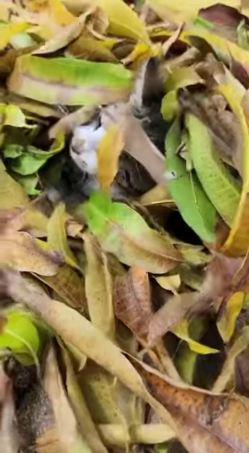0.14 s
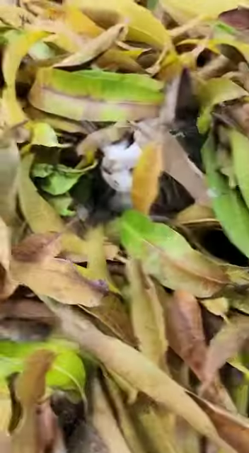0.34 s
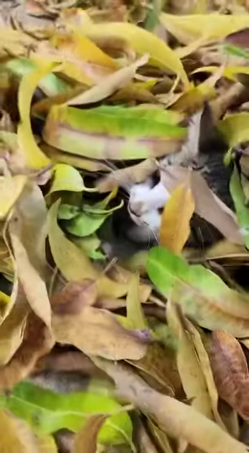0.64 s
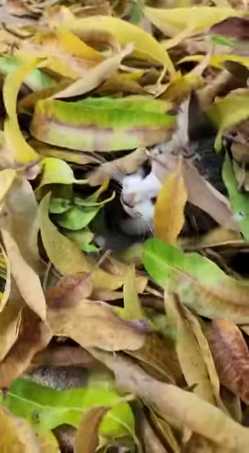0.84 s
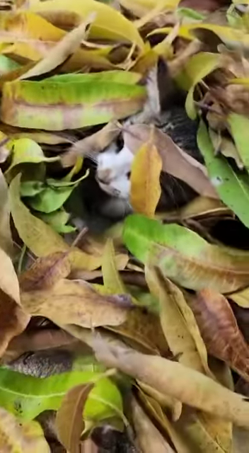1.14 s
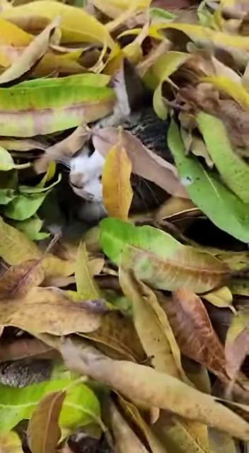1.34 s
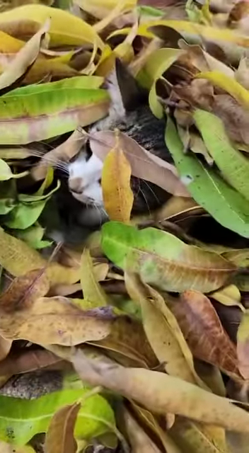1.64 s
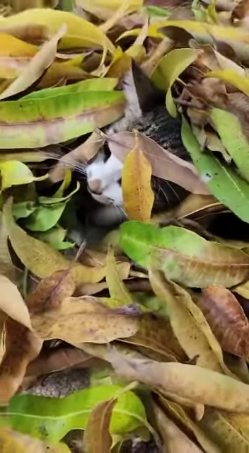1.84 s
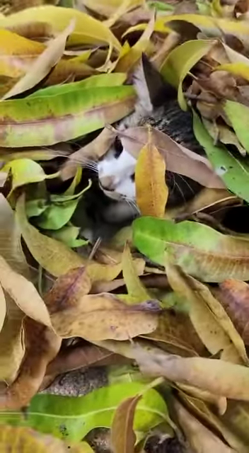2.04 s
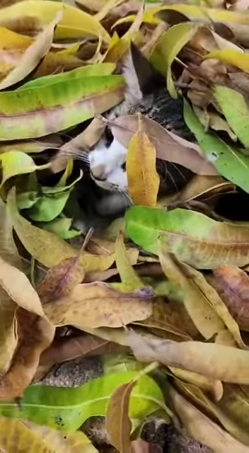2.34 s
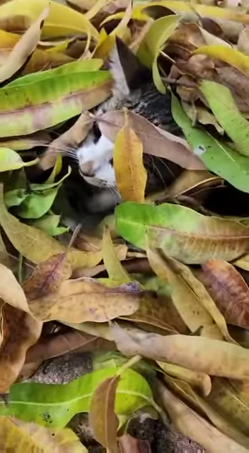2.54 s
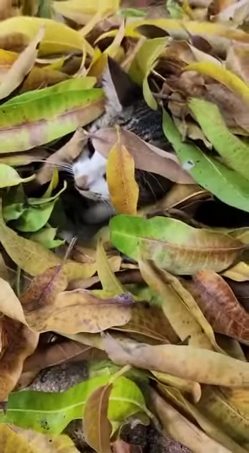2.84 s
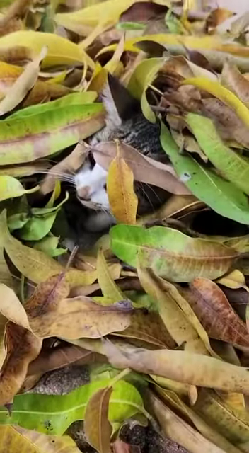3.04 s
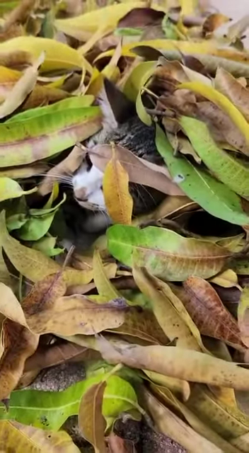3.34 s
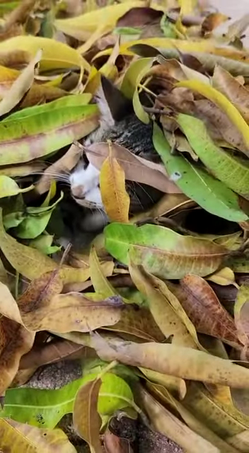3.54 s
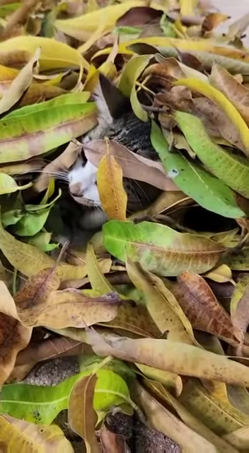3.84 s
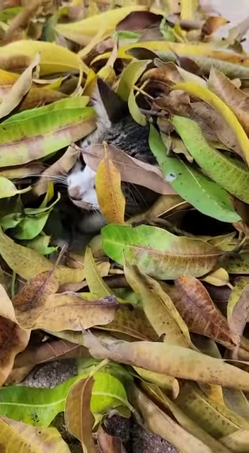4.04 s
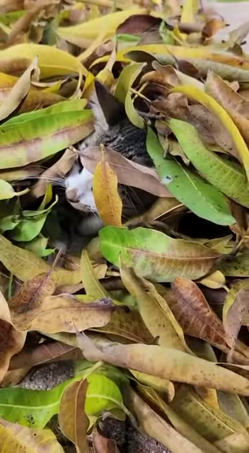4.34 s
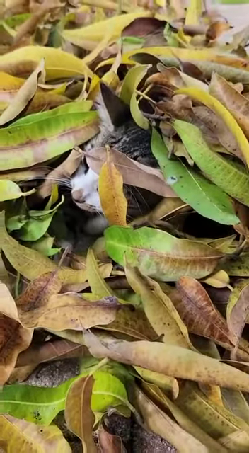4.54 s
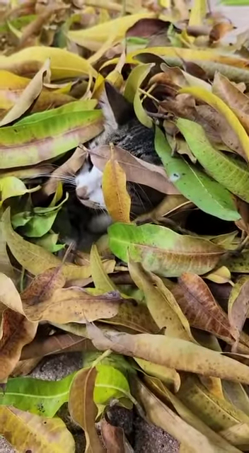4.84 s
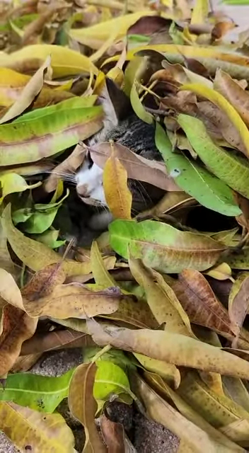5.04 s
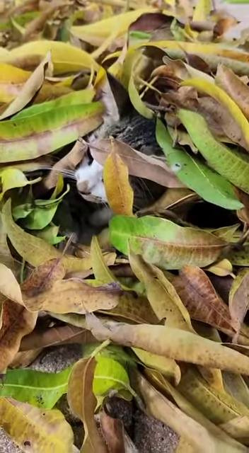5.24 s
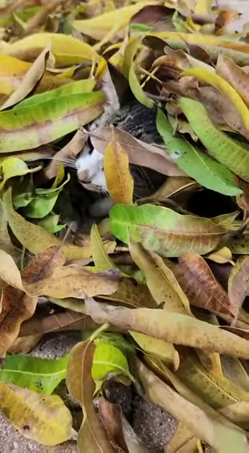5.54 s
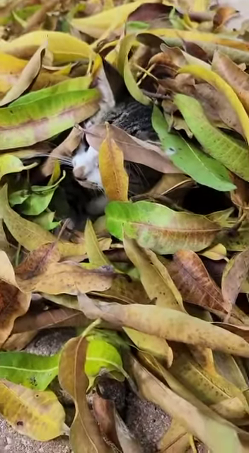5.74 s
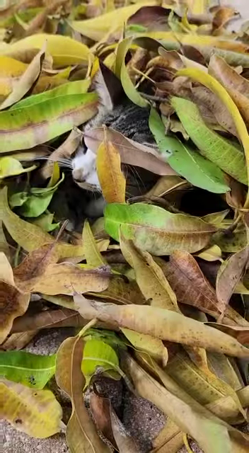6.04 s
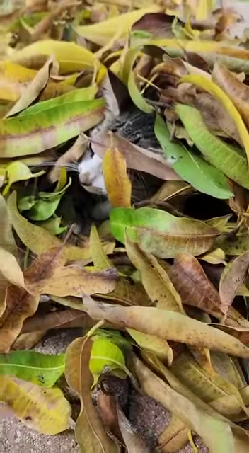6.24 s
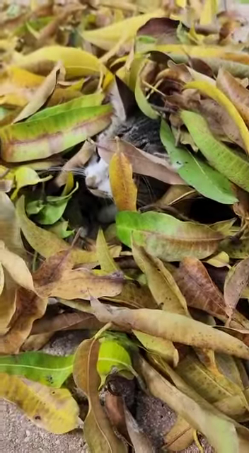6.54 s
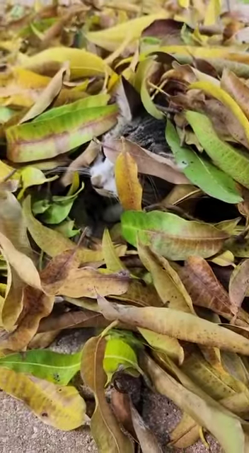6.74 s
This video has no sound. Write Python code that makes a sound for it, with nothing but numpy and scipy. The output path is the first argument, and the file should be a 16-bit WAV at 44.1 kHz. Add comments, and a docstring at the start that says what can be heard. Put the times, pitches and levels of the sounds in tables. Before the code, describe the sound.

Brief piercing kitten cries break into rasping hisses from under a leaf heap, with faint thin whistles, a leaf snap and soft wind puffs.

```python
"""Walled yard: a frightened kitten under a heap of dry leaves gives five shrill cries, close by.
Each starts as a puff of breath and rises to a squeal near 2 kHz; most break up into a rasping hiss.
The cries are sums of partials and half-step partials through a throat filter, plus filtered breath.
Thin whistles are unsteady near-sines; leaves are bursts of noise and random clicks.
Filtered noise gives a low outdoor rumble, faint drones and puffs of wind."""
import sys
import numpy as np
from scipy import signal
from scipy.fft import rfft, irfft, next_fast_len
from scipy.io import wavfile

SR = 44100
rng = np.random.default_rng(int(sys.argv[2]) if len(sys.argv) > 2 else 0)


def wav_record(signal):
    """Record a signal, one row per channel, as 16-bit PCM in the file named by sys.argv[1]."""
    frames = np.transpose(np.atleast_2d(signal))
    bounded = np.clip(frames, -1, 1)
    # unit amplitude maps onto the largest positive 16-bit level
    quanta = np.round(bounded * 32767).astype(np.int16)
    wavfile.write(sys.argv[1], SR, quanta)


N = 303399
T = np.arange(N) / SR

# Kitten's cries. Each row: start, climb, sag in seconds; pitch at catch, crest, end in Hz;
# level at catch, before leap, at crest, at end in dB ahead of the cry gain;
# rasp on climb, at crest, at end, and period doubling, all 0-1.
CRIES = [ (.960, 0.041, .054, 1929, 2279, 2280, -26.5, -24, -18.5, -23, 0.37, 0.06, 0, 0),
         (1.43, .062, 0.13, 2015, 2175, 1995, -24.5, -23, -17.5, -20.5, 0.14, 0.34, 0.88, 0.59),
         (3.591, .064, 0.033, 2060, 2420, 2296, -39.5, -32, -32, -29.5, 0.45, .5, .65, 0.2),
         (3.780, .064, .144, 1941, 2162, 2012, -24, -22.5, -21, -23.5, 0.21, 0.4, 0.89, 0.6),
         (5.659, 0.054, 0.13, 2050, 2430, 1946, -40, -45, -35, -37.5, 0.49, 0.76, 0.87, .35)]
# Whistles of the nearly closed throat. Each row: start, length in seconds, first, last pitch in Hz,
# mid-length level in dB.
WHISTLES = [(0.895, 0.13, 1980, 2200, -57), (1.296, 0.25, 2048, 2240, -51.5),
            (2.825, 0.17, 2160, 2067, -60), (3.39, 0.069, 2020, 2170, -54.5),
            (3.442, .045, 2184, 2314, -43.5), (3.478, .12, 2384, 2680, -44), (5.417, .185, 1877, 2490, -49),
            (5.579, 0.098, 2404, 2196, -54.5), (6.093, .65, 2052, 2100, -64.5)]
# Throat resonances. Each row: frequency in Hz, relative gain in dB.
THROAT_SPECTRUM = [(1600, -19), (2200, -11), (2650, -2), (3150, -5.5), (3600, -5), (4300, 2.5),
                   (4900, -1.5), (6500, 2.5), (7200, 0.5), (8000, -0.5), (8900, -22.5), (9900, -12.5),
                   (14500, -16.5), (16000, -26)]
# Breath through the open mouth. Each row: frequency in Hz, relative level in dB.
MOUTH_SPECTRUM = [(900, -46), (1600, -25), (2100, -27), (2550, -11), (3100, 15), (4000, 5), (4800, 4.5),
                  (6300, -3.5), (7700, 8), (8900, -53), (9700, 2), (11200, -37), (14500, -19), (16000, -26)]
# Direct cries at the two ports. Each row: frequency in Hz, left minus right in dB ahead of the pan.
PORT_DIFFERENCE = [(2000, 6), (4300, 3.5), (6600, 1.5), (7600, 4.5), (8400, -11), (10000, -12.5),
                   (12000, -4), (15000, 3.5)]
# Dry leaves snapping. Each row: start in seconds, relative peak in dB.
SNAPS = [(0.6115, -23), (0.6134, -30), (0.615, -37), (1.975, -47), (2.667, -61)]
# Spectrum of a snap. Each row: frequency in Hz, relative level in dB.
SNAP_SPECTRUM = [(500, -28), (1300, -7), (2050, -3), (2700, -4), (3400, -2), (4500, 8.5), (6000, -8),
                 (9000, -25), (15000, -37)]
# Leaves shifting. Each row: start-side centre in seconds, rise, fall to 1/e in seconds, peak level in dB.
SHIFTS = [(.07, 0.17, 0.086, -55), (.66, 0.46, 0.095, -57), (2.81, 0.077, 0.085, -53.5),
          (3.5, .04, 0.088, -59)]
# Spectrum of rustling. Each row: frequency in Hz, relative level in dB.
LEAF_SPECTRUM = [(1000, -7), (2500, 12.5), (5000, 6.5), (7500, 10), (9500, -6), (15500, -6)]
# Outdoor air. Each row: frequency in Hz, relative level in dB.
AIR_SPECTRUM = [(12, -18.5), (20, -7), (43, 1), (101, -4), (172, -10.5), (357, -16.5), (472, -26),
                (513, -21.5), (660, -24.5), (1570, -31), (1760, -34.5), (2080, -35.5), (3440, -39.5),
                (7310, -45), (16000, -91)]
# Stereo spread of the outdoor air. Each row: frequency in Hz, side minus mid in dB.
AIR_SIDE = [(40, -24), (150, -17), (350, -11), (700, -2), (1300, 0.5), (3000, -0.5), (12000, 0)]
# Faint resonances of the surroundings. Each row: frequency, width in Hz, level in dB.
DRONES = [(196.7, 18, -57.5), (353, 20, -61), (792, 160, -62), (2013, 340, -70)]
# Puffs of wind. Each row: centre, half width to 1/e in seconds, peak level in dB ahead of the pan.
GUSTS = [(1.36, 0.055, -38.5), (2.115, 0.035, -25), (2.31, 0.11, -29), (2.477, 0.027, -25.5),
         (2.85, 0.16, -39), (3.32, 0.3, -41.5), (4.71, 0.044, -32)]
# Spectrum of the wind. Each row: frequency in Hz, relative level in dB.
WIND_SPECTRUM = [(20, -12), (45, 3.5), (65, -5), (90, -5), (140, -21.5), (300, -39), (1000, -87)]

# Cry: puff, catch, climb, leap, sag, release
ATTACK_S, CATCH_S, LEAP_S, RELEASE_S = .013, .053, .030, .04
PUFF_PITCH_SHARE, PUFF_RASP = .84, 1  # pitch as a share of the catch
PUFF_DB, PUFF_BREATH_DB = -11, 7.5  # level against the catch; extra breath
CLIMB_PITCH_SHARE = .42  # part of the pitch rise covered before the leap
SAG_SWELL_DB, RELEASE_DB, RELEASE_PITCH_SHARE = 1, -26, .89
CLEAR_BREATH_DB, RASPY_BREATH_DB = -29.5, -1.5  # breath against voice at rasp 0 and 1
CRY_GAIN_DB = .5
WHISTLE_EDGE_DB = -9  # ends against the middle
SETTLING_DB, AIR_DB, BREEZE_DB = -76, -39.5, -51.5  # steady rustle, air, wind between puffs
TOP_HZ = 15850
OPPOSITE = np.array([[1], [-1]])  # left, right


def undb(db):
    """Decibels to gain."""
    return 10 ** (np.asarray(db) / 20)


def unit(x):
    """Scale to rms 1."""
    return x / np.sqrt(np.mean(x ** 2) + 1e-18)


def span(start_s, length_s):
    """Sample indices that an event covers."""
    return np.flatnonzero((T >= start_s) & (T <= start_s + length_s))


def colour(x, points, share=1):
    """Zero-phase filter by a share of a (Hz, dB) spectrum."""
    n = x.shape[-1]
    size = next_fast_len(n + 512)
    point_hz, point_db = np.transpose(points)
    hz = np.maximum(np.arange(size // 2 + 1) * SR / size, 1)
    gain = undb(share * np.interp(np.log(hz), np.log(point_hz), point_db))
    return irfft(rfft(x, size) * gain, size)[..., :n]


def wobble(hz):
    """Low-passed random motion, rms 1."""
    lowpass = signal.butter(2, hz, fs=SR, output="sos")
    return unit(signal.sosfilt(lowpass, rng.standard_normal(N)))


def cries(jitter=.0499, jitter_hz=190, slip_skew=.32, waver=.0051, waver_hz=60,
          shimmer=.65, shimmer_hz=150, doubling_db=-5.5, flap=.2, dull_db=-.42, full_db=-23):
    """Tight vocal folds squeal; with rasp their period and swing turn irregular and breath takes over."""
    out = np.zeros(N)
    # near their tightest, the folds slip further down in pitch than up
    slip = -np.exp(slip_skew * wobble(jitter_hz))
    slip = unit(slip - slip.mean())
    drift, swing = wobble(waver_hz), wobble(shimmer_hz)
    air = unit(colour(rng.standard_normal(N), MOUTH_SPECTRUM))
    throat_hz, throat_db = np.transpose(THROAT_SPECTRUM)
    multiples = np.arange(2, 17)[:, None] / 2  # partials 1 to 8 and the lines halfway between
    for cry in CRIES:
        i, hz, db, rasp, breath_db, doubling = gesture(*cry)
        detune = jitter * rasp * slip[i] + waver * drift[i]
        phase = 2 * np.pi * np.cumsum(hz * (1 + detune)) / SR
        # a weaker push closes the folds more softly: upper partials drop
        weakness_db = np.clip(full_db - db, 0, 10)
        gains = undb(dull_db * weakness_db * np.maximum(multiples - 2, 0) ** .5)
        # alternating long and short cycles move power to the halfway lines, most in the treble
        shift = np.minimum(doubling * undb(doubling_db) * np.sqrt(multiples), np.pi / 4)
        gains = gains * np.where(multiples % 1, np.sin(shift), np.cos(shift))
        lags = rng.uniform(0, 2 * np.pi, multiples.shape)
        folds = np.sum(gains * np.sin(multiples * phase - lags), axis=0)
        folds *= 1 + shimmer * np.sqrt(np.clip(rasp, 0, 1)) * np.tanh(swing[i])
        # the throat turns pitch slips into flickering partials; its expected rms is divided out
        passed = gains * undb(np.interp(multiples * hz, throat_hz, throat_db))
        voice = colour(folds, THROAT_SPECTRUM) / np.sqrt(np.sum(passed ** 2, axis=0) / 2)
        # the folds modulate the breath once a cycle
        breath = undb(breath_db) * air[i] * (1 + flap * np.cos(phase))
        out[i] += undb(db) * (voice + breath) / np.sqrt(1 + undb(2 * breath_db))
    return out


def gesture(start_s, climb_s, sag_s, catch_hz, crest_hz, end_hz, catch_db, leap_db, crest_db, end_db,
            climb_rasp, crest_rasp, end_rasp, doubling):
    """One cry's samples, pitch, level, rasp, breath and period doubling as the folds catch, then lose hold."""
    catch, leap, crest, end, stop = np.cumsum([CATCH_S, climb_s, LEAP_S, sag_s, RELEASE_S])
    i = span(start_s, stop)
    t = T[i] - start_s
    sagged = np.clip((t - crest) / sag_s, 0, 1)
    leap_hz = catch_hz + CLIMB_PITCH_SHARE * (crest_hz - catch_hz)
    hz = np.interp(t, [0, catch, leap, crest, end, stop],
                   [PUFF_PITCH_SHARE * catch_hz, catch_hz, leap_hz, crest_hz, end_hz,
                    RELEASE_PITCH_SHARE * end_hz])
    puff_db = catch_db + PUFF_DB
    db = np.interp(t, [0, ATTACK_S, catch, leap, crest, end, stop],
                   [puff_db + RELEASE_DB, puff_db, catch_db, leap_db, crest_db, end_db,
                    end_db + RELEASE_DB])
    db = db + SAG_SWELL_DB * np.sin(np.pi * sagged)
    # folds settle at the catch and lose hold ever faster in the sag
    puff = 1 - np.minimum(t / catch, 1) ** 3
    rasp = np.interp(t, [leap, crest], [climb_rasp, crest_rasp])
    rasp = rasp + (PUFF_RASP - climb_rasp) * puff + (end_rasp - crest_rasp) * sagged ** 2
    # rougher folds leak more air
    leak = np.abs(rasp) ** 3.5
    breath_db = CLEAR_BREATH_DB + (RASPY_BREATH_DB - CLEAR_BREATH_DB) * leak + PUFF_BREATH_DB * puff
    return i, hz, db, rasp, breath_db, doubling * np.interp(sagged, [0, .3, 1], [.15, 1, .8])


def whistles(jitter=.012, jitter_hz=300, wander=.01, wander_hz=15, octave_db=-22,
             flutter_db=4, flutter_hz=50):
    """Air drawn through the narrow throat sings an unsteady, almost pure tone."""
    out = np.zeros(N)
    flutter = flutter_db * wobble(flutter_hz)
    slip = jitter * wobble(jitter_hz) + wander * wobble(wander_hz)
    for start_s, length_s, first_hz, last_hz, level_db in WHISTLES:
        i = span(start_s, length_s)
        along = (T[i] - start_s) / length_s
        hz = first_hz + (last_hz - first_hz) * along
        db = level_db + WHISTLE_EDGE_DB * (2 * along - 1) ** 2 + flutter[i]
        phase = 2 * np.pi * np.cumsum(hz * (1 + slip[i])) / SR
        tone = np.sin(phase) + undb(octave_db) * np.sin(2 * phase)
        out[i] += undb(db) * np.sqrt(2) * tone
    return out


def snaps(crackle_db=-20, decay_s=.0024):
    """Each snap is one sharp break and a few milliseconds of crackle in the dry blade."""
    t = T[:1024]
    out = np.zeros(N)
    for start_s, peak_db in SNAPS:
        crack = undb(crackle_db) * rng.standard_normal(len(t)) * np.exp(-t / decay_s)
        crack[0] = 1
        start = int(start_s * SR)
        out[start:start + len(t)] += undb(peak_db) * crack
    out = colour(out, SNAP_SPECTRUM)
    loudest_db = max(peak_db for _, peak_db in SNAPS)
    return out * undb(loudest_db) / np.abs(out).max()


def rustle(grains_per_s=5000, spread_db=1.5):
    """Leaf edges slide over each other in dense, tiny clicks."""
    clicks = (rng.random((2, N)) < grains_per_s / SR) * rng.standard_normal((2, N))
    clicks = clicks * undb(spread_db * rng.exponential(size=(2, N)))
    motion = undb(SETTLING_DB)
    for peak_s, rise_s, fall_s, db in SHIFTS:
        motion = motion + undb(db) * np.exp(-np.maximum((peak_s - T) / rise_s, (T - peak_s) / fall_s))
    return unit(colour(clicks, LEAF_SPECTRUM)) * motion


def outdoor_air():
    """Steady distant rumble: mid and side noise with a slight slow swell."""
    swell_db = .3 * wobble(1.5)
    mid, side = (unit(colour(rng.standard_normal(N), AIR_SPECTRUM)) for _ in range(2))
    return (mid + OPPOSITE * colour(side, AIR_SIDE)) * undb(AIR_DB + swell_db)


def drones():
    """Faint resonances: sines whose amplitude wanders at random, giving narrow bands."""
    out = np.zeros(N)
    for hz, width_hz, db in DRONES:
        out += undb(db) * np.sqrt(2) * wobble(width_hz / 2) * np.sin(2 * np.pi * hz * T)
    return out


def wind(side_db=-6, pan_db=-3):
    """Low turbulent noise on the microphone ports, in puffs over a weak breeze."""
    mid, side = (unit(colour(rng.standard_normal(N), WIND_SPECTRUM)) for _ in range(2))
    gusts = sum(undb(db) * np.exp(-((T - centre_s) / width_s) ** 2) for centre_s, width_s, db in GUSTS)
    stereo = mid + OPPOSITE * undb(side_db) * side
    return stereo * (gusts + undb(BREEZE_DB)) * undb(OPPOSITE * pan_db / 2)


def yard(x, t60_low_s=.54, t60_high_s=.27, split_hz=7500, tail_db=-6, high_db=-1, build_s=.015,
         near_db=-4, near_s=.019):
    """Leaves and ground scatter the sound at once; the walls return a short, diffuse tail."""
    t = T[:SR]
    low, high = (signal.sosfilt(signal.butter(2, split_hz, kind, fs=SR, output="sos"),
                                rng.standard_normal((2, SR))) for kind in ("low", "high"))
    fade = np.log(1000) * t
    tail = low * np.exp(-fade / t60_low_s) + undb(high_db) * high * np.exp(-fade / t60_high_s)
    tail = tail * (1 - np.exp(-t / build_s))
    near = rng.standard_normal((2, SR)) * np.exp(-t / near_s)
    response = (undb(tail_db) * unit(tail) + undb(near_db) * unit(near)) / np.sqrt(SR)
    return signal.fftconvolve(x[None], response, axes=1)[:, :N]


def ports(x, lag_s=.0001956, pan_db=1.0):
    """Direct sound reaches the left port a little sooner, each port with its own colour."""
    left = undb(pan_db / 2) * colour(x, PORT_DIFFERENCE, 1 / 2)
    right = undb(-pan_db / 2) * colour(np.interp(T - lag_s, T, x), PORT_DIFFERENCE, -1 / 2)
    return np.array([left, right])


def scene(snap_room_db=-8):
    """Kitten under its heap; the snapping leaves lie on top, nearer and drier."""
    kitten = undb(CRY_GAIN_DB) * cries() + whistles()
    ticks = snaps()
    reflections = yard(kitten + undb(snap_room_db) * ticks)
    background = outdoor_air() + drones() + wind()
    return ports(kitten) + ticks + reflections + rustle() + background


def record(dry):
    """Steep elliptic low-pass removes the top."""
    return signal.sosfilt(signal.ellip(10, .2, 80, TOP_HZ, fs=SR, output="sos"), dry)


dry = scene()
out = record(dry)
wav_record(out)
```